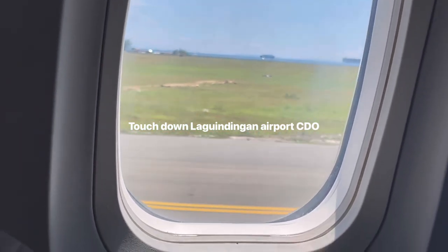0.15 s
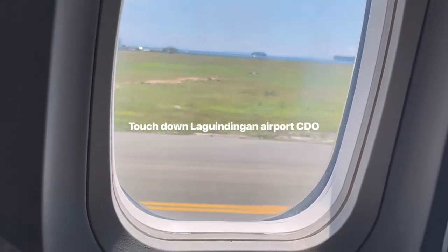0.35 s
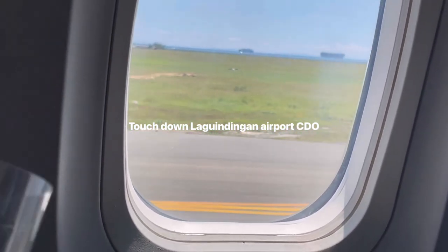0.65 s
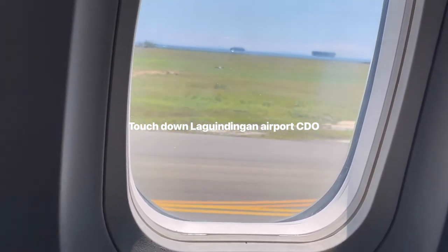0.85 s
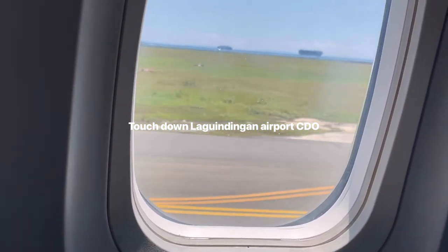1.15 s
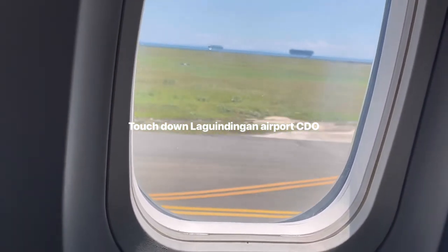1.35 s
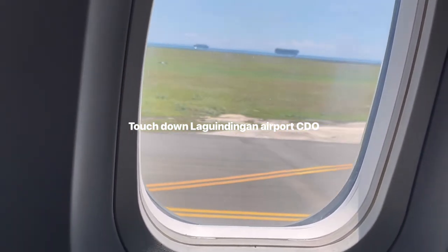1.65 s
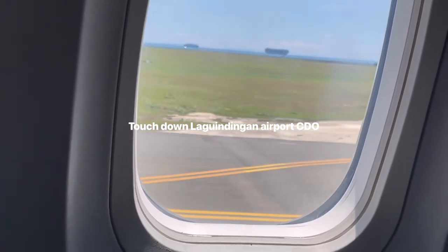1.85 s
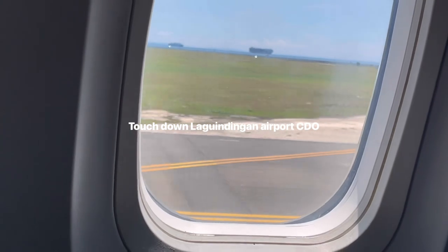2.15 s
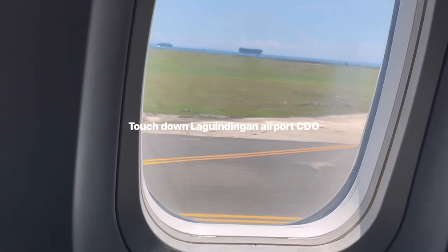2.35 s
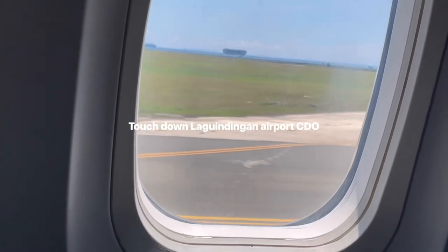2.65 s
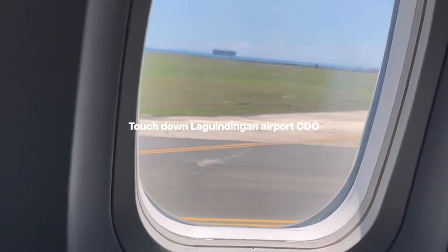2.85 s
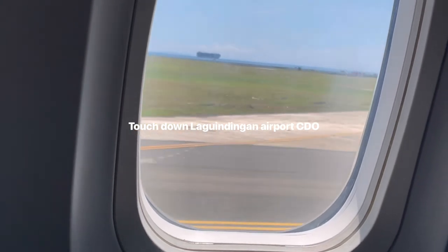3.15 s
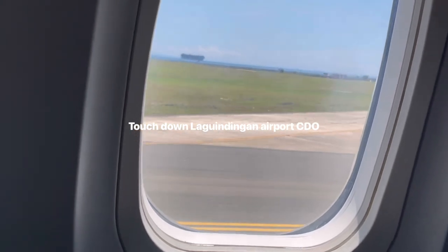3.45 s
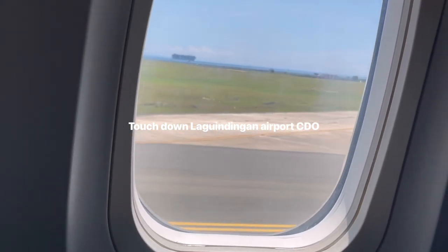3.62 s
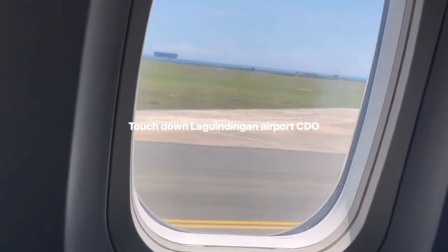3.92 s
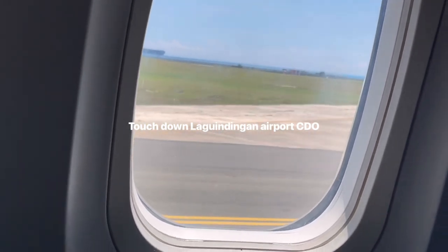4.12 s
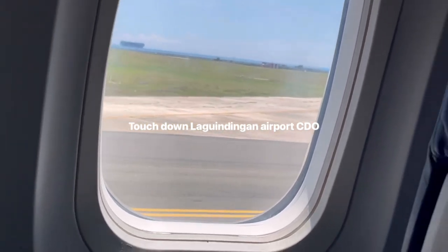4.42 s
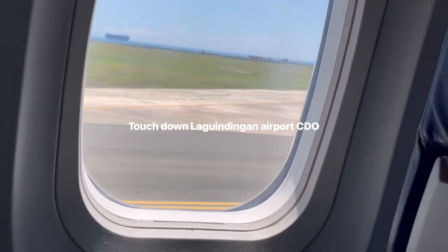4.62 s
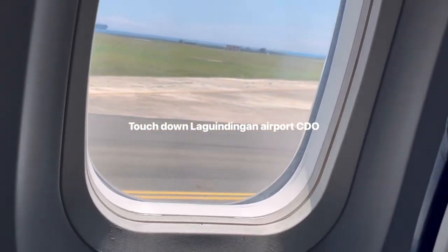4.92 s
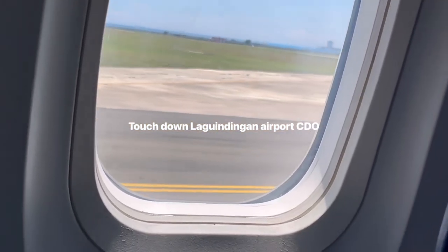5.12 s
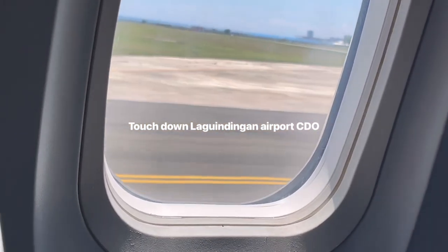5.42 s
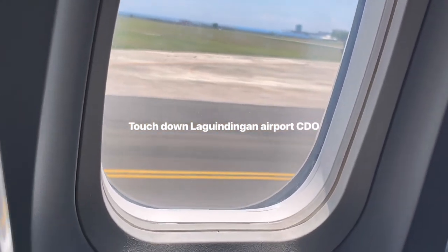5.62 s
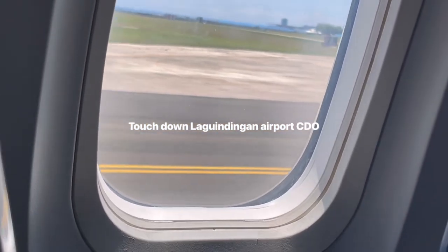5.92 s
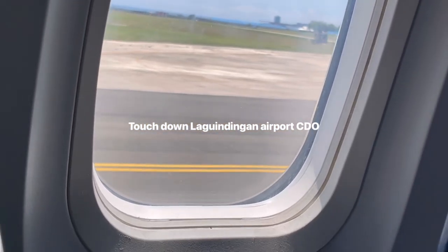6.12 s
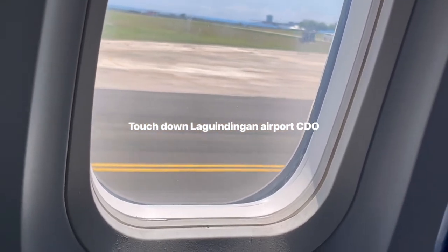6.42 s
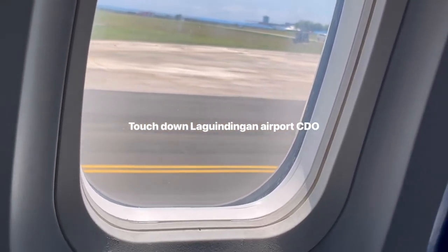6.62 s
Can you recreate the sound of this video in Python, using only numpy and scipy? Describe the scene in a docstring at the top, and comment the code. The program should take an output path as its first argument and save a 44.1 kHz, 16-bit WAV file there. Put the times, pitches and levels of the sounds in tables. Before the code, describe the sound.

Inside a plane rolling fast on the runway, a loud throbbing low hum dominates over soft airflow, while cabin trim faintly ticks and rattles.

```python
"""Propellers drone in a wavering stack of low tones, inside the cabin of an airliner rolling fast along the runway.
The tones are sines whose level, pitch or strength wander; tyres, airflow and air vents are shaped noise.
Two turbines whine faintly in thin lines, beside a breathy whistle and a low, slowly wavering machine hum.
The trim ticks and rustles in short noise bursts, and once a small piece of metal clinks in decaying sines.
A phone held at the window hears it through two ports."""
import sys
import numpy as np
from scipy import signal
from scipy.fft import rfft, irfft, next_fast_len
from scipy.io import wavfile
from scipy.ndimage import map_coordinates

SR = 44100
rng = np.random.default_rng(int(sys.argv[2]) if len(sys.argv) > 2 else 0)


def bounce(signal):
    """Save signal as a 16-bit WAV file at the path given by the first command-line argument."""
    frames = np.transpose(np.atleast_2d(signal))
    limited = np.clip(frames, -1, 1)
    pcm = np.round(limited * 32767).astype(np.int16)
    wavfile.write(sys.argv[1], SR, pcm)


def rack_gain(trim_db):
    """Turn a fader trim in dB into the linear factor to multiply a signal by."""
    fader = np.asarray(trim_db, float)
    return 10 ** (fader / 20)


N = 298557  # length in samples
BLADE_HZ = 65.71  # blade rate that spaces the overtones and the sidebands


def unit(x):
    """Scaled to rms 1."""
    return x / np.sqrt(np.mean(np.abs(x) ** 2) + 1e-20)


def along(points, hz):
    """Reads a curve of (Hz, value) points on a log frequency axis."""
    point_hz, value = np.transpose(points)
    return np.interp(np.log(hz + 1), np.log(point_hz + 1), value)


def curves(rows):
    """One value per sample for each column after the time."""
    seconds, *columns = np.transpose(rows)
    return [np.interp(np.arange(N) / SR, seconds, column) for column in columns]


def wobble(rate):
    """A smooth random curve of rms 1, rate knots a second."""
    knots = rng.standard_normal(int(N * rate / SR) + 4)
    return unit(map_coordinates(knots, [np.arange(N) * rate / SR]))


def spread(mid, side, alike):
    """Left and right from two unrelated signals, at a given likeness."""
    turn = np.arccos(np.clip(alike, -1, 1)) / 2
    near, far = np.cos(turn) * mid, np.sin(turn) * side
    return np.array([near + far, near - far])


def fuzzy(hz, wander_rate, steady):
    """A tone of about rms 1: a steady share of its power, the rest wandering in strength and phase."""
    wander = wobble(wander_rate) + 1j * wobble(wander_rate)
    swing = np.sqrt(steady) + np.sqrt((1 - steady) / 2) * wander
    phase = 2 * np.pi * (np.cumsum(hz * np.ones(N)) / SR + rng.random())
    return np.sqrt(2) * np.real(swing * np.exp(1j * phase))


# Left-right likeness of the noise. Each row: frequency in Hz, likeness from -1 to 1 (read below 5300 Hz only).
NOISE_LIKENESS = [(60, 0.98), (90, 0.88), (140, 0.94), (200, 0.93), (310, 0.83), (460, 0.8), (700, 0.24),
                  (1050, 0.21), (1580, 0.63), (2380, 0.98), (3590, 0.63), (5400, 0.97), (8130, 0.43),
                  (12200, -0.38)]


def rush(spectrum):
    """Stereo noise of rms 1, coloured by a spectrum curve."""
    m = next_fast_len(N)
    hz = np.fft.rfftfreq(m, 1 / SR)
    mid, side = rfft(rng.standard_normal((2, m))) * rack_gain(along(spectrum, hz))
    alike = np.where(hz < 5300, along(NOISE_LIKENESS, hz), .985)  # the treble comes from one near vent
    return unit(irfft(spread(mid, side, alike), m)[:, :N])


# Low rumble and the mid-range body above it. Each row: frequency in Hz, relative noise density in dB.
RUMBLE_SPECTRUM = [(20, -20), (35, -35), (47, -5.5), (52, 5), (90, -0.5), (150, -1), (220, -7), (330, -3),
                   (420, -7), (500, -14.5), (600, -50.5)]
BODY_SPECTRUM = [(350, -54), (500, -8.5), (580, 0.5), (660, -4), (750, -7), (880, -5.5), (1100, -14),
                 (1350, -16.5), (1500, -25.5), (2000, -51)]


def tyres_and_airflow():
    """Tyres and airflow rumble through the hull: two bands of noise whose levels waver slightly."""
    rumble_db = -20.5 + 0.55 * wobble(3.99)
    body_db = -33 + 0.15 * wobble(8)
    return rack_gain(rumble_db) * rush(RUMBLE_SPECTRUM) + rack_gain(body_db) * rush(BODY_SPECTRUM)


# Colour of the vent hiss. Each row: frequency in Hz, relative noise density in dB.
HISS_SPECTRUM = [(1200, -37), (1500, 6.5), (2200, 3), (3200, -2), (3800, -5.5), (4800, -22), (7000, -28),
                 (8600, -10), (9500, -18), (13000, -25)]


def air_vents():
    """Air rushing from the vents hisses, its level wavering both slowly and quickly."""
    hiss_db = -48 + 0.39 * wobble(1.68) + 0.37 * wobble(8.7)
    return rack_gain(hiss_db) * rush(HISS_SPECTRUM)


# A low, slowly wavering machine hum. One row: frequency in Hz, level in dB, wander in random knots per second.
MACHINE_HUM = (260, -37.5, 1.47)


def machine_hum():
    """A low tone that wanders slowly in strength and phase."""
    hz, db, wander_rate = MACHINE_HUM
    return rack_gain(db) * fuzzy(hz, wander_rate, steady=0)


# Breath of the whistle. Each row: centre in Hz, level in dB, wander in random knots per second.
WHISTLE_BREATH = [(4165, -71, 110), (4260, -68.5, 400)]
# The thin tone inside it sinks slowly. Each row: time in seconds, pitch in Hz.
WHISTLE_GLIDE = [(0, 4203), (2.2, 4200), (3.5, 4183), (4.6, 4168), (6.77, 4165)]
# The blade beat splits the thin tone into three lines. Each row: distance in blade rates, level in dB.
BLADE_SIDEBANDS = [(-1, -79), (0, -74), (1, -77)]


def whistle():
    """Fast-wandering tones blur into breath around a sinking tone split by the blade beat."""
    breath = sum(rack_gain(db) * fuzzy(hz, wander_rate, 0) for hz, db, wander_rate in WHISTLE_BREATH)
    glide_hz, = curves(WHISTLE_GLIDE)
    thin = sum(rack_gain(db) * fuzzy(glide_hz + away * BLADE_HZ, 6, .3) for away, db in BLADE_SIDEBANDS)
    return breath + thin


# The two engines. Each row: base frequency in Hz (itself silent), level in dB of its strongest line.
ENGINES = [(2293.4, -76), (2327, -73.5)]
# Lines of each whine. Each row: multiple of the base frequency, level in dB relative to the engine.
WHINE_LINES = [(2, 0), (3, -2), (4, -4.5)]


def turbines():
    """Two engines at slightly different speeds whine in thin lines."""
    drift = 1 + .0004 * wobble(1.5)  # shaft speed hunts a little
    whine = np.zeros(N)
    for hz, db in ENGINES:
        for multiple, relative_db in WHINE_LINES:
            whine += rack_gain(db + relative_db) * fuzzy(multiple * hz * drift, 8, .5)
    return whine


BURST_S = np.arange(SR // 5) / SR  # time axis of one trim sound, in seconds


def burst(hz, width):
    """Noise of rms 1 in one broad resonance, width in natural-log units."""
    f = np.fft.rfftfreq(len(BURST_S), 1 / SR)
    resonance = np.exp(-(np.log(f / hz + 1e-9) / width) ** 2)
    return unit(irfft(rfft(rng.standard_normal(len(BURST_S))) * resonance))


def onset(rise_s):
    """A rounded attack that closes in on full level with the given time constant."""
    return 1 - np.exp(-BURST_S / rise_s)


def place(events):
    """Lays (start in seconds, sound) pairs on the timeline."""
    out = np.zeros(N + SR)
    for start_s, sound in events:
        out[round(start_s * SR):][:len(sound)] += sound
    return out[:N]


# Trim ticks. Each row: start in seconds, level in dB.
TRIM_TICKS = [(1.2663, -40), (2.139, -40.5), (2.2046, -38.5), (2.2423, -33), (2.2782, -34.5), (2.4374, -39),
              (2.5386, -38.5), (2.786, -35.5), (2.9294, -33.5), (3.3844, -43.5), (3.458, -33.5),
              (4.0592, -42)]


def ticks():
    """Each tick is a bright noise burst that dies at once."""
    decay_db = -60 * BURST_S / 0.015  # 60 dB in 15 ms
    return place((s, rack_gain(db + decay_db) * onset(.0003) * burst(9700, 0.44)) for s, db in TRIM_TICKS)


# Trim rustles. Each row: start in seconds, level in dB, length in seconds, centre in Hz.
TRIM_RUSTLES = [(2.258, -53, 0.07, 9050), (3.036, -49.5, 0.045, 10510), (3.968, -43, .022, 7510),
                (4.03, -49, 0.016, 7540), (4.058, -41.5, 0.0084, 7000), (4.153, -47, 0.029, 6500),
                (4.197, -51, 0.016, 7030), (4.244, -47, 0.029, 8000)]


def rustle(db, length_s, hz):
    """Uneven slips make the noise crackle for a moment, then it trails off."""
    trail_db = -60 * np.maximum(BURST_S - length_s, 0) / 0.12
    fade_db = -5 * BURST_S / length_s + trail_db
    crackle_db = 3 * np.interp(BURST_S * 300, np.arange(64), rng.standard_normal(64))  # 300 slips a second
    return rack_gain(db + fade_db + crackle_db) * onset(0.00094) * burst(hz, 0.77)


def rustles():
    """All the rustles of the trim in turn."""
    return place((s, rustle(db, length_s, hz)) for s, db, length_s, hz in TRIM_RUSTLES)


# A small metal clink. Each row: start in seconds, level in dB.
METAL_CLINK = [(6.342, -37)]
# Modes of the metal. Each row: frequency in Hz, relative level in dB, time to fall 60 dB in seconds.
METAL_MODES = [(4700, 0, 0.022), (5340, -2, 0.017), (4260, -6, 0.017), (5900, -8, .015)]


def clink():
    """Metal modes ring briefly, with a crack of noise around them."""
    t = BURST_S
    ring = sum(rack_gain(db - 60 * t / t60) * np.sin(2 * np.pi * hz * t) for hz, db, t60 in METAL_MODES)
    crack = rack_gain(-3 - 60 * t / .03) * burst(4970, 0.19)
    return place((s, rack_gain(db) * onset(0.0032) * (ring + crack)) for s, db in METAL_CLINK)


# The blade-passing tone swells and dips. Each row: time in seconds, level in dB.
BLADE_LEVEL = [(0.0, -12), (0.07, -15), (0.28, -14.5), (0.36, -15), (0.66, -13.5), (1.05, -12.5),
               (1.13, -24), (1.24, -10.5), (1.41, -17), (1.75, -13), (1.81, -20), (1.9, -16), (1.96, -25),
               (2.11, -10.5), (2.39, -15.5), (2.6, -12), (2.77, -21.5), (2.92, -13.5), (3.13, -13),
               (3.2, -24), (3.34, -10.5), (3.62, -13.5), (3.79, -26), (3.85, -14), (4.28, -21.5),
               (4.34, -11.5), (4.9, -25), (4.94, -14.5), (5.11, -20.5), (5.37, -13.5), (6.03, -14.5),
               (6.26, -17), (6.35, -10), (6.49, -19.5), (6.71, -17.5), (6.77, -16)]
# Its pitch drifts. Each row: time in seconds, pitch in Hz.
BLADE_PITCH = [(0.0, 67), (0.38, 66.3), (0.53, 63.63), (1.87, 65.33), (2.0, 62.6), (2.19, 65.4),
               (3.11, 65.07), (3.22, 67.7), (3.34, 65.9), (3.98, 63.3), (4.11, 66.8), (6.35, 64.86),
               (6.47, 66.4), (6.77, 66.6)]
# Its second harmonic swells and dips too. Each row: time in seconds, level in dB.
SECOND_LEVEL = [(0.0, -21), (0.41, -20), (1.39, -24), (1.47, -15.5), (1.6, -26), (1.64, -37), (1.79, -17.5),
                (2.22, -26), (2.28, -16), (2.49, -39), (2.69, -20.5), (3.94, -22.5), (4.03, -38),
                (4.13, -16.5), (4.24, -34.5), (4.58, -14.5), (4.94, -36), (5.02, -18), (5.37, -27.5),
                (5.43, -15), (5.94, -29.5), (5.98, -17.5), (6.09, -35.5), (6.19, -18.5), (6.73, -24.5),
                (6.77, -37)]
# The fourth harmonic wavers, and surges once about four seconds in. Each row: time in seconds, level in dB.
FOURTH_LEVEL = [(0.0, -28.5), (2.45, -29), (2.51, -39), (3.07, -30), (4.0, -31.5), (4.09, -22), (4.6, -29),
                (6.62, -34), (6.77, -26.5)]
# Third to eighth harmonic. Each row: multiple of the blade rate, wander in random knots per second,
# left-right likeness setting from 0 to 1.
BLADE_OVERTONES = [(3, 22, .85), (4, 16, .8), (5, 30, .7), (6, 22, .75), (7, 16, .7), (8, 20, .5)]
# Average levels in dB of the third, fifth, sixth, seventh and eighth harmonic, in one list.
OVERTONE_LEVELS = [-29, -35, -31, -38, -40.5]


def propellers():
    """The blades beat on the hull; rough inflow makes each harmonic waver on its own."""
    blade_db, = curves(BLADE_LEVEL)
    blade_hz = curves(BLADE_PITCH)[0] + .7 * wobble(4.5)  # the pitch wavers
    blade_tone = rack_gain(blade_db) * fuzzy(blade_hz, 12, steady=1)

    second_db, = curves(SECOND_LEVEL)
    second_hz = 131.45 + 1.12 * wobble(5)
    second = rack_gain(second_db) * spread(fuzzy(second_hz, 12, 0.86), fuzzy(second_hz, 9.3, 0), 0.98)

    out = blade_tone + second
    third_db, *upper_db = OVERTONE_LEVELS
    levels_db = [third_db, *curves(FOURTH_LEVEL), *upper_db]
    for (multiple, wander_rate, alike), db in zip(BLADE_OVERTONES, levels_db):
        hz = multiple * BLADE_HZ
        out += rack_gain(db) * spread(fuzzy(hz, wander_rate, 0.18), fuzzy(hz, wander_rate, 0.42), alike)
    return out


def scene():
    """Everything heard at the window seat."""
    background = tyres_and_airflow() + air_vents() + machine_hum() + whistle()
    trim = ticks() + rustles() + clink()
    return background + turbines() + trim + propellers()


def filtered(x, response):
    """x times a complex response of frequency."""
    m = next_fast_len(N + SR // 2)
    return irfft(rfft(x, m) * response(np.fft.rfftfreq(m, 1 / SR)), m)[..., :N]


def low_pass(x):
    """Removes everything above the highest recorded frequency."""
    return signal.sosfilt(signal.butter(12, 12840, fs=SR, output="sos"), x)


# Colour of the port resonance. Each row: frequency in Hz, gain in dB.
PORT_COLOUR = [(9000, 0), (9700, 2), (10400, 8.5), (11100, 7.5), (12000, 1), (12500, -3.5), (12900, -10)]
# Tilt between the ports. Each row: frequency in Hz, dB by which the left is louder and the right softer.
PORT_TILT = [(100, .4), (600, .55), (1200, 0)]


def record(dry):
    """The ports ring in the treble, where the two channels turn a full cycle against each other."""
    resonance_hz, width_hz = 10290, 1230

    def ports(hz):
        away = (hz - resonance_hz) / width_hz
        turn = np.pi / 2 + np.arctan(away ** 3 + 1.05 * away)  # half a cycle in each channel
        left = rack_gain(along(PORT_TILT, hz)) * np.exp(-1j * turn)
        return rack_gain(along(PORT_COLOUR, hz)) * np.array([left, 1 / left])

    return low_pass(filtered(dry, ports))


dry = scene()
out = record(dry)
bounce(out)
```